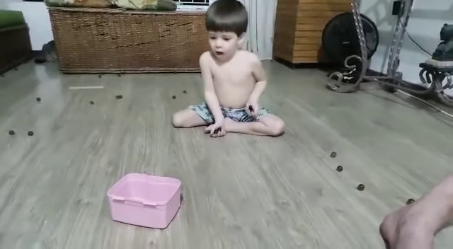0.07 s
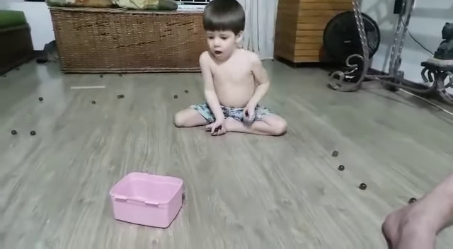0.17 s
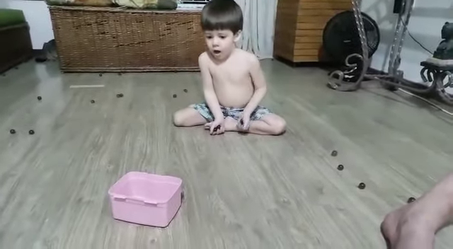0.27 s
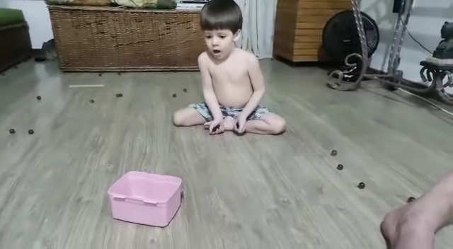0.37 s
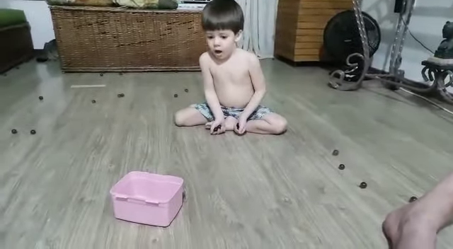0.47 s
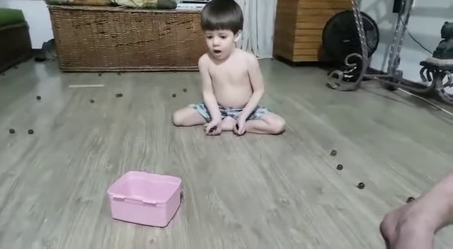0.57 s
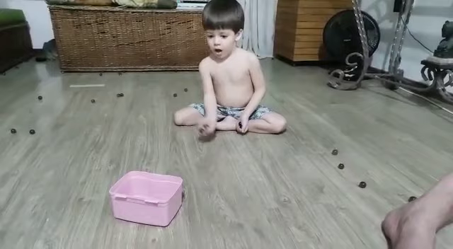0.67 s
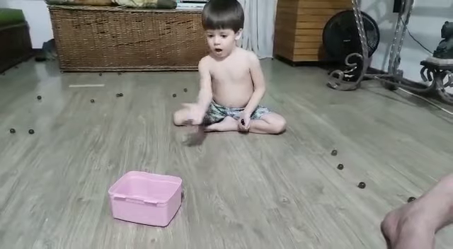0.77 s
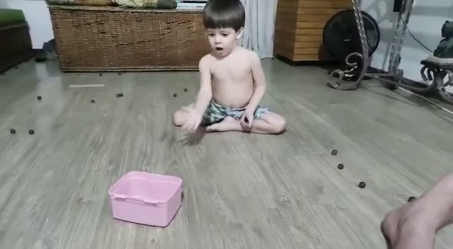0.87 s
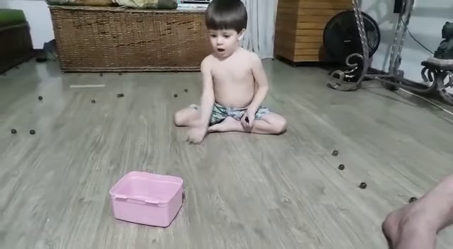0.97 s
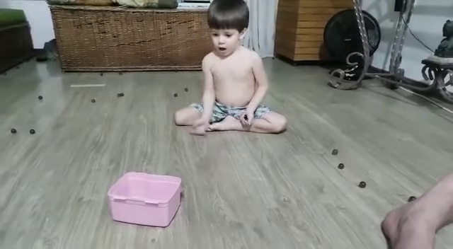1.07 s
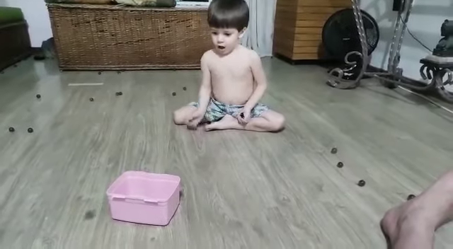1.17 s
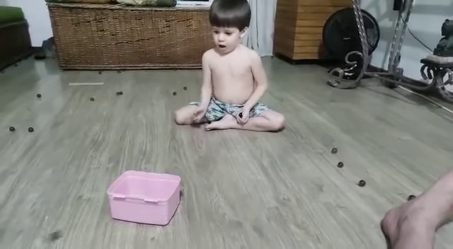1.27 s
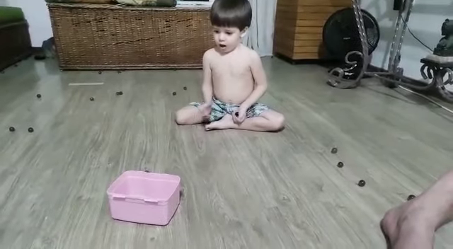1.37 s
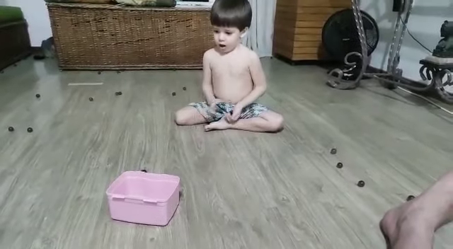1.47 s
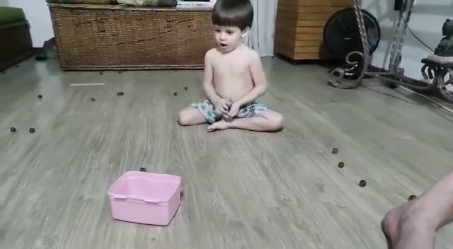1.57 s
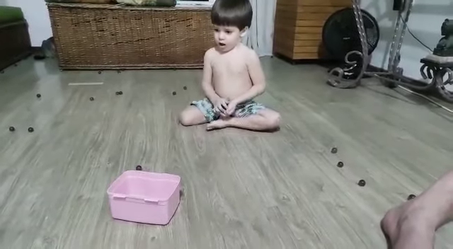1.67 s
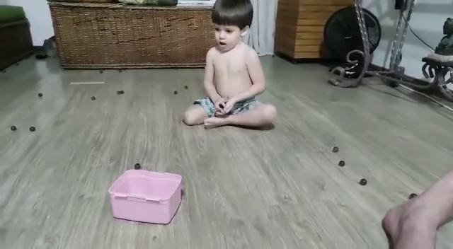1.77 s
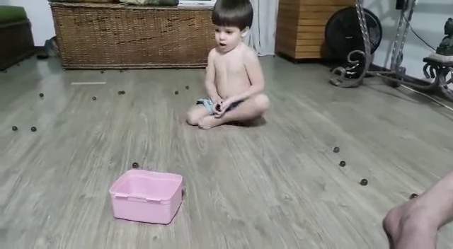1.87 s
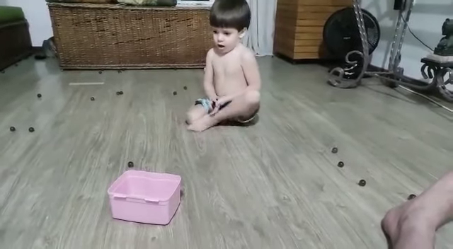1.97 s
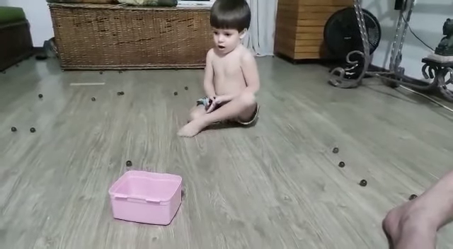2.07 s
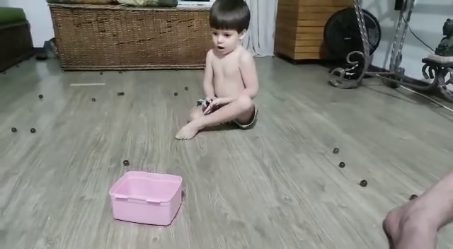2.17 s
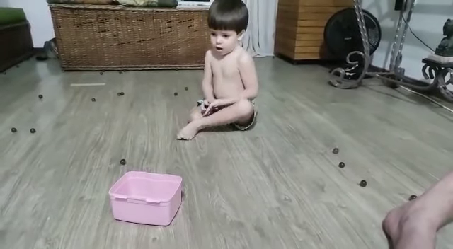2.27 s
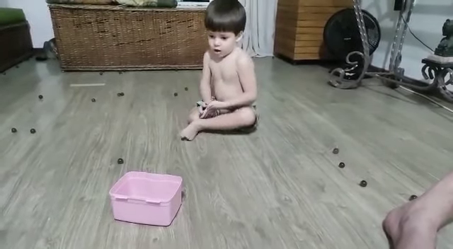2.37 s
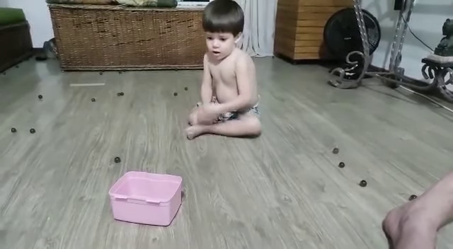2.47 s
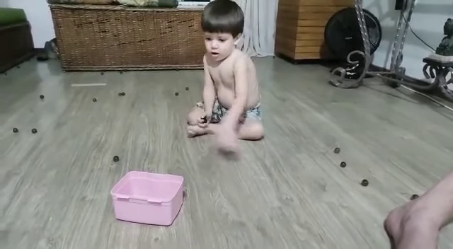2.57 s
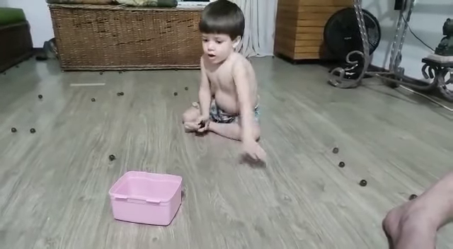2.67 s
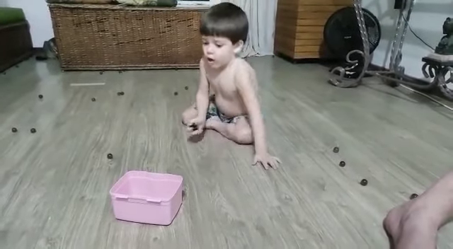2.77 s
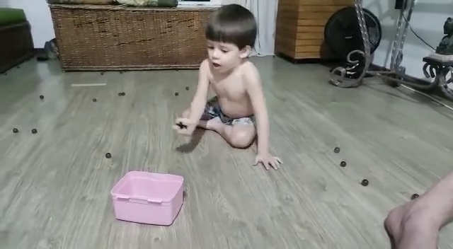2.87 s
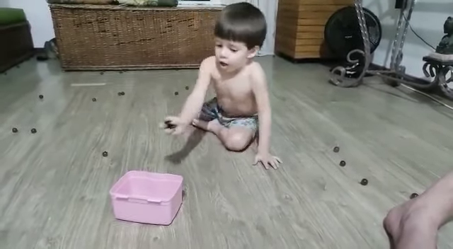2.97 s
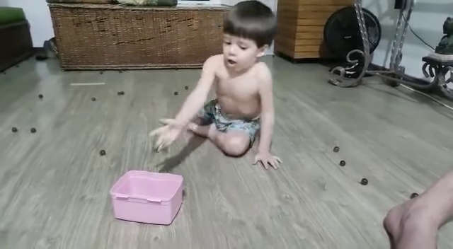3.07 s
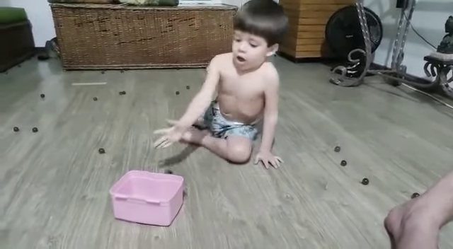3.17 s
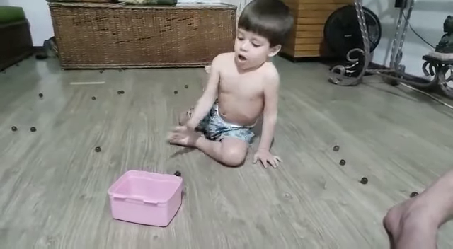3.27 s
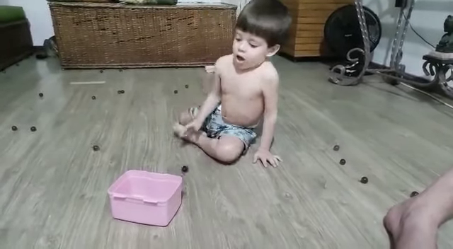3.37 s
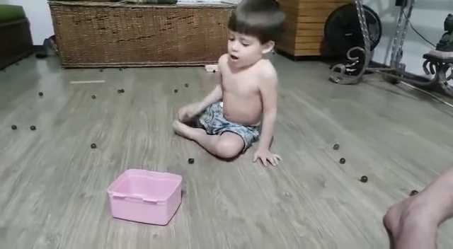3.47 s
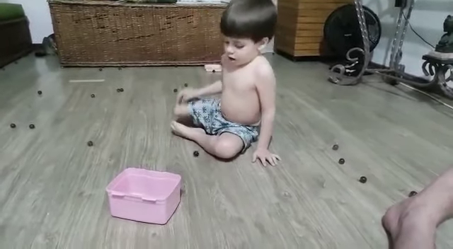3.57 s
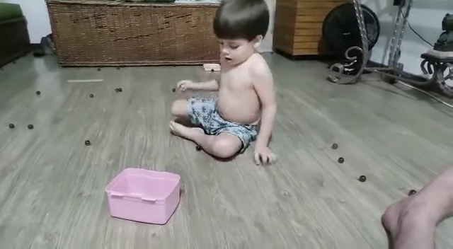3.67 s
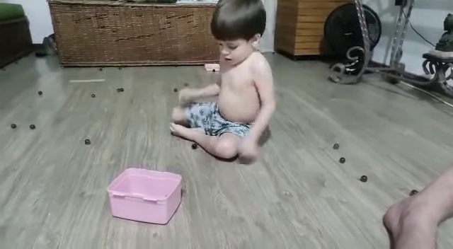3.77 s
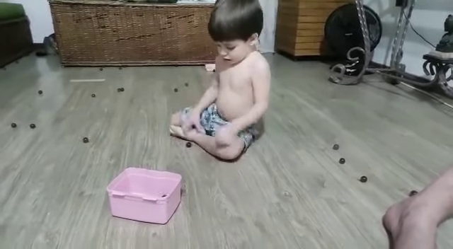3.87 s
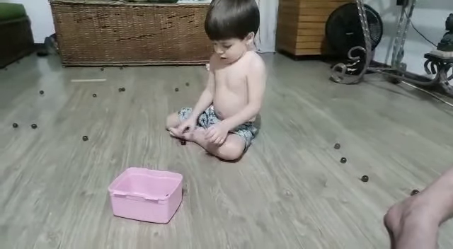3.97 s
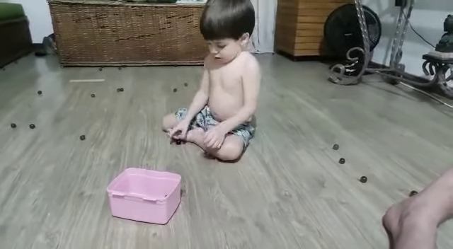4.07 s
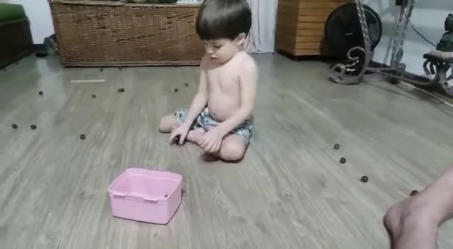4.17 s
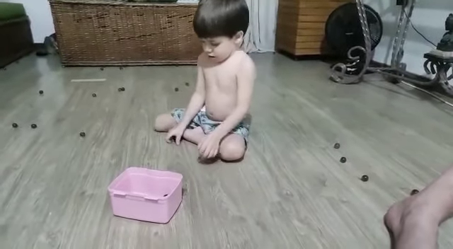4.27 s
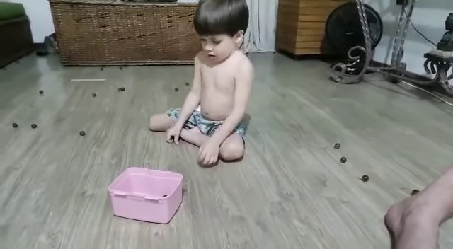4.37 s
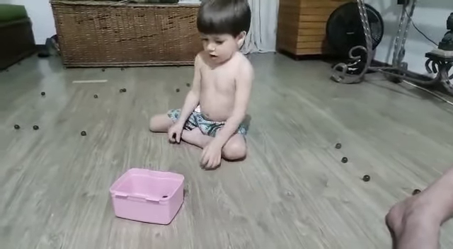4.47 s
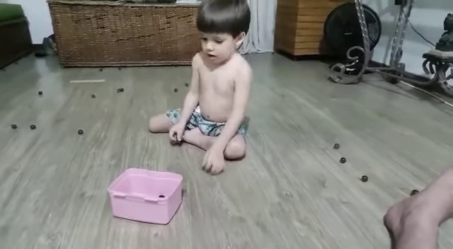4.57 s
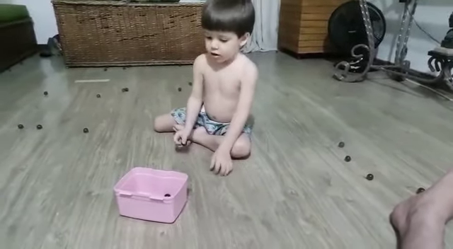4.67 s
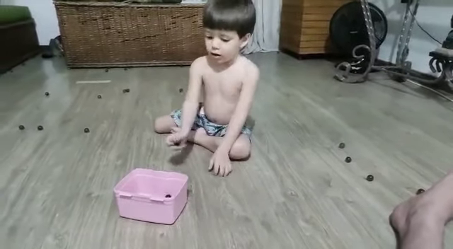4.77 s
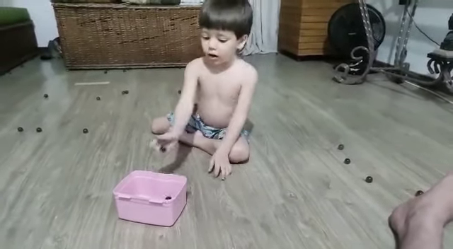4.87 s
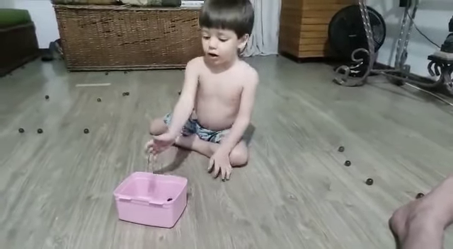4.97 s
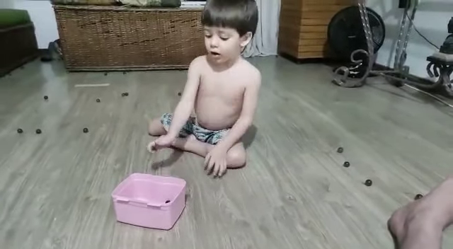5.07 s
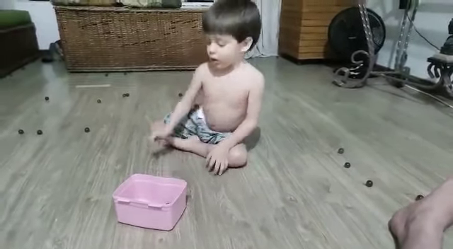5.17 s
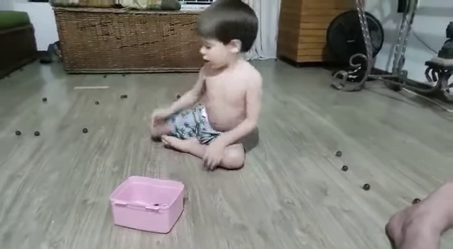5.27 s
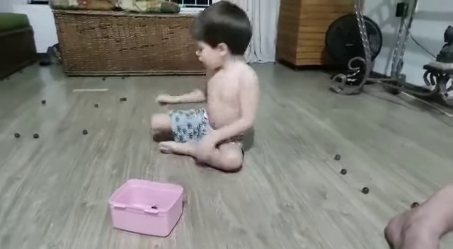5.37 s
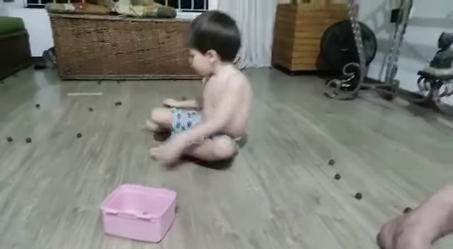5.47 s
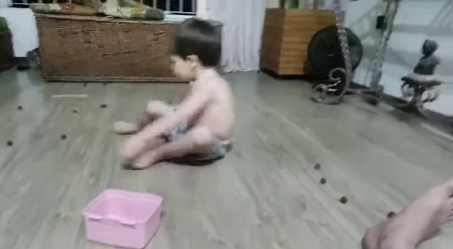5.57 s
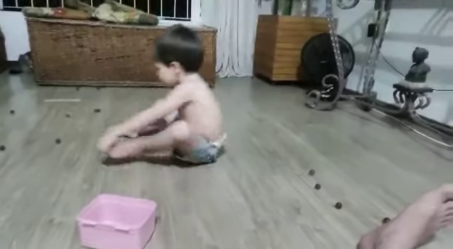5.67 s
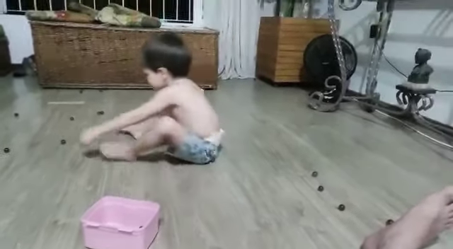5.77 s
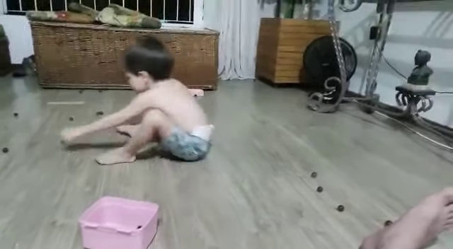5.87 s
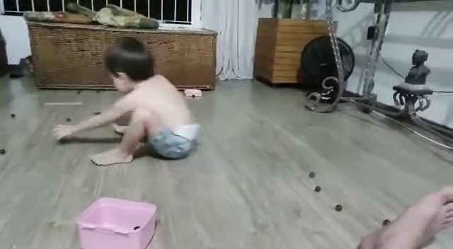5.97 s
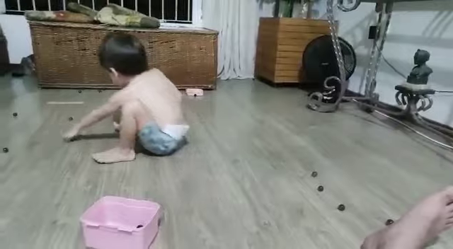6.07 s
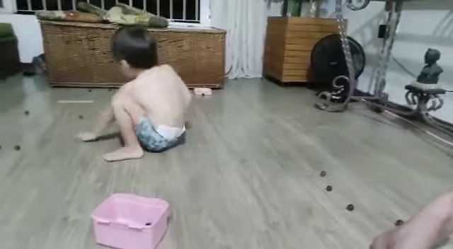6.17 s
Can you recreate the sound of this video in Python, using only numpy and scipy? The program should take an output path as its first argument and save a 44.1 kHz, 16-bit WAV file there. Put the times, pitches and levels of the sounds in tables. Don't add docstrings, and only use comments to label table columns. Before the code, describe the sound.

A lively hard-floored living room, heard close in stereo over quiet air noise and a faint low hum. A skin rub on varnish dies away in the first quarter second; a tiny glass clink comes at 0.8. From 1.07 to 1.3 several marbles strike laminate with loud, sharp cracks and woody knocks, then weaker bounces and rolling until about 2, with a bright ring of under a second. Skin squeaks and hisses from 2.4 to 3.2. At 3.2 to 3.45 another loud burst includes a hard plastic tub hit, then a dull roll and scattered tiny skips. Longer faint squeaky shuffling runs 3.75 to 5.1. At 5.15 marbles clatter in the tub, loudest at 5.17, bouncing until 5.45 and rolling away. A soft microphone thump at 5.54 leads into low body thuds, cloth drag and squeaking to the end.

```python
import sys
import numpy as np
from scipy import signal
from scipy.fft import rfft, irfft
from scipy.io import wavfile
from scipy.ndimage import uniform_filter1d

SR = 44100
rng = np.random.default_rng(int(sys.argv[2]) if len(sys.argv) > 2 else 0)


def voltage_ratio(decibels):
    exponent = np.asarray(decibels, float) / 20
    return 10 ** exponent


def transcribe(u):
    v = np.clip(np.atleast_2d(u).T, -1, 1)
    q = np.round(v * 32767).astype(np.int16)
    wavfile.write(sys.argv[1], SR, q)


N = 273640
TIME = np.arange(N) / SR

# start_s, peak_db, knock_over_thud_db, crack_over_thud_db, room_share_db (low when close to
MARBLE_BLOWS = [(1.069, -3.5, 4, 9, 2.5), (1.08, -5.5, 1, 4.5, -3.5), (1.127, -11, 4.5, 10, -1.5),
                (1.215, -4.5, 3.5, 5.5, -7), (1.225, -3.5, 3, 8.5, -4), (1.294, -10.5, -1, 1, -9),
                (1.404, -24.5, 4, -14, -14.5), (1.44, -17, 6.5, -3.5, -10.5), (1.463, -19.5, -2, -8.5, -4),
                (1.564, -27, -7, -22, 2.5), (1.585, -31.5, 1, -22.5, -4), (1.611, -18, -2.5, -22.5, -15),
                (1.665, -14, 3, -3.5, -5), (1.689, -23, -2.5, -10, -14.5), (1.757, -35, -12, -7, -16),
                (1.908, -25.5, 2, -10, -9.5), (1.917, -29, -1.5, -3, -6.5),
                (2.822, -39, -8.5, -10.5, -3), (3.224, -16, -6, -6.5, -0.5), (3.324, -2.5, 4.5, 10, -2.5),
                (3.351, -16.5, 0, -1, 0), (3.419, -6.5, 3.5, 6, -2), (3.449, -9, 3, 1.5, -7.5),
                (3.678, -29, -1, -24, -2.5), (3.731, -26.5, -1, -11, -4.5), (3.914, -33.5, 3, -7, -7),
                (4.087, -31, -3, -14.5, -4.5), (4.144, -39.5, 2, -16, -13), (4.321, -46.5, -5, -6, 6.5),
                (4.341, -42, 3, -2, 0.5), (4.396, -37, 10, -2, -7), (5.931, -45.5, -6, -7, 7)]
TUB_BLOWS = [
    (3.273, -7, -1, 7, -5),
    (3.278, -13, -8, -21, -1),
    (3.284, -15.5, -8, -22, -9.5),
    (5.147, -14.5, -17, -7.5, -5),
    (5.171, -4.5, 0, 0.5, -5),
    (5.327, -9, -7.5, -6, -8.5),
    (5.397, -13, -5.5, -3, -8),
    (5.432, -19.5, -7.5, -21, -5.5),
    (5.45, -15, -5.5, -14, -7.5),
]
CLINKS = [
    (0.81, -41, 12, 31.5, -6.5),
    (3.989, -44, 19, 18, -8),
]
# start_s, length_s, level_db, loss_over_run_db, brightness_db
ROLLS = [
    (1.237, 0.35, -38, 18, 4),
    (1.762, 0.3, -41.5, 29, -8),
    (3.413, 0.68, -38.5, 10, -7.5),
    (4.146, 0.34, -61, -0.5, -4.5),
    (5.206, 0.67, -36.5, 46, 3),
]

# pitch_hz, width_hz, level_db
BOARD_THUD = [(440, 258, -3.5), (696, 267, 1.33), (1040, 970, 1.5)]
LAMINATE_KNOCK = [(1913, 730, -2.5), (2664, 532, -1)]
GLASS_CRACK = [(3283, 810, -1.5), (4300, 1950, 4.5), (7500, 18000, -18.5), (12030, 7700, -32)]
GLASS_PING = [(5383, 2800, 12), (8010, 4700, -9.5), (12000, 4000, -12)]
TUB_PARTS = [
    [(285, 353, -0.5), (695, 560, 4), (1067, 198, -2.5)],
    [(2027, 300, 0.3), (2360, 650, 3)],
    [(3540, 2900, 4), (5200, 5200, -8.5), (7820, 6800, -9.5), (13500, 5200, -30)],
]

# start_s, pressure_db
SLIDES = [
    [(0.0, 2), (0.15, -10), (0.25, -24)],
    [(2.4, -12.5), (2.49, -20), (2.56, -8.5), (2.75, -16.5), (2.86, -4), (3.1, 0.5), (3.21, -3)],
    [(3.75, -4.5), (4.05, -3.5), (4.25, -6), (4.33, -0.5), (4.41, 0.5), (4.66, -4), (5.12, -7.5)],
    [(5.55, -4.5), (5.79, -8.5), (5.88, -7.5), (5.93, 0), (6.03, -9.5), (6.2, -8.5)],
]
# squeak_hz, squeak_db, whistle_db, hiss_db, fine_hiss_db
SLIDE_VOICES = [(2440, -77, -77.5, -76.5, -89), (2880, -63, -68, -70, -81.5), (2730, -69, -69, -84, -96),
                (2720, -62, -67.5, -68.5, -78)]
# pitch_hz, width_hz
RUB = [(4700, 520), (6200, 2800), (10500, 4500)]
# start_s, end_s, start_db, end_db
DRAGS = [
    (2.5, 2.75, -92, -92),
    (4.55, 4.95, -91, -92),
    (5.65, 6.2, -83.5, -77),
]
# pitch_hz, width_hz, level_db
WEAVE = [(8530, 900, -4), (10900, 1000, -3)]
# start_s, level_db, fade_db_per_s
BOOMS = [(1.09, -49.5, 24.5), (1.5, -48.5, 60), (1.66, -55.5, 18), (3.28, -47, 24), (3.87, -54.5, 58.5),
         (4.09, -52, 104), (5.18, -52.5, 10), (5.54, -47, 54.5), (5.929, -45, 97)]
# start_s, peak_db, pitch_hz, nail_db
TAPS = [
    (1.5, -25, 192, -28),
    (4.57, -36.5, 153, -21.5),
    (5.544, -16, 220, -36),
]

# pitch_hz, decay_s (to -60 dB)
ROOM_T60 = [(250, 0.84), (660, 0.82), (1740, 0.65), (4500, 0.66), (8000, 0.5), (14000, 0.42)]
# pitch_hz, level_db
ROOM_COLOUR = [(250, -2), (700, -3.46), (1500, 6.5), (2500, -0.36), (4500, 3.5), (8000, 2.5), (14000, -4.5)]
# pitch_hz, level_db (per Hz)
AIR = [(18, -70), (30, -38), (124, -8), (149, -30.5), (184, -16.5), (336, -22.5), (374, -23.5), (461, -13),
       (616, -27.5), (1220, -24.5), (1590, -28.5), (2120, -32.5), (16000, -61)]
# pitch_hz, likeness (-1 to 1)
LIKENESS = [(60, 0.95), (180, 0.95), (550, 1), (1650, -0.072), (4970, 0.055), (15000, 0.43)]
# pitch_hz, left_over_right_db
PORTS = [(60, -6), (150, -4.5), (380, 2.5), (950, -5.5), (2380, -7.5), (5980, -2), (15000, 8.5)]

BENDING_S = 0.0016
WALL_S = 0.034
ECHO_DB, ECHO_FOLLOWS = -17, 0.36
ROOM_HARDER = 1.03
ROLL_ATTACK_S, ROLL_RELEASE_S = 0.056, 0.03
SQUEAK_HZ_PER_DB, FINE_FOLLOWS = 35.5, 0.4
BOOM_RISE_DB_PER_S, BOOM_LASTS_S = 397.5, 0.42
AIR_DB = -52.5
HUM_HZ, HUM_WIDTH_HZ, HUM_DB = 119, 10, -62
RIGHT_LAG = 10
GATE_DB, TREBLE_GATE_DB = -55, -59.5
FIZZ_DB, FIZZ_KNEE_DB = -55, -32
FIZZ_HOLD_S = 0.012
CUTOFF_HZ = 16000


def at_hz(points, hz):
    table_hz, value = np.transpose(points)
    return np.interp(np.log(hz), np.log(table_hz), value)


def rms_one(x):
    return x / np.sqrt(np.mean(x ** 2) + 1e-20)


def butter(x, order, hz, kind="low"):
    return signal.sosfilt(signal.butter(order, hz, kind, fs=SR, output="sos"), x)


def resonate(x, hz, width_hz):
    r = np.exp(-np.pi * width_hz / SR)
    feedback = [1, -2 * r * np.cos(2 * np.pi * hz / SR), r * r]
    return signal.lfilter(np.array([1, 0, -1]) * (1 - r * r) / 2, feedback, x + 1e-18)


def resonate_twice(x, hz, width_hz):
    return resonate(resonate(x, hz, width_hz), hz, width_hz)


def body(clicks, modes):
    out = 0
    for k, (hz, width, db) in enumerate(modes):
        gain = voltage_ratio(db) * SR / (2 * np.pi * width)
        out = out + (-1) ** k * gain * resonate(clicks, hz, width)
    return out


def bending(x):
    size = x.shape[-1]
    hz = np.clip(np.fft.rfftfreq(size, 1 / SR), 3000, None)
    delay_s = BENDING_S * (np.sqrt(10000 / hz) - 1.2)
    phase = -2 * np.pi * np.cumsum(delay_s) * SR / size
    return irfft(rfft(x) * np.exp(1j * phase), size)


def blows(table, parts, contact_hz):
    near, far, size = np.zeros((2, N + 4096)), np.zeros((3, N + 4096)), 2048
    luck = rng.random((len(table), 2, 2, 4))
    click = signal.unit_impulse(size, 64)
    pushes = [butter(click, 2, hz) for hz in contact_hz]
    thud, knock, crack = [bending(body(push, modes)) for push, modes in zip(pushes, parts)]
    thud = np.roll(thud, -75)
    for k, (s, db, knock_db, crack_db, share_db) in enumerate(table):
        start, wall = round(s * SR) - 64, round((s + WALL_S) * SR)
        mix_db = np.array([0, knock_db, crack_db])
        spread = voltage_ratio(ROOM_HARDER * mix_db)
        room_feed = spread @ [thud, knock, crack] / np.linalg.norm(spread)
        far[k % 3, start:start + size] += voltage_ratio(db + share_db) * room_feed
        low, mid, high = voltage_ratio(mix_db)[:, None] * [thud, knock, crack]
        hard = mid + high
        pair = np.zeros((2, size))
        for side in range(2):
            echoes = 0
            for when, sign in zip(*luck[k, side]):
                lag = int(when * 0.0025 * SR) + 12
                echoes = echoes + np.sign(sign - 0.5) * 0.5 * np.roll(hard, lag)
            pair[side] = low + hard + echoes
        pair /= np.abs(pair[0] + np.roll(pair[1], RIGHT_LAG)).max() / 2
        near[:, start:start + size] += voltage_ratio(db - 1) * pair
        near[:, wall:wall + size] += voltage_ratio(db + ECHO_DB + ECHO_FOLLOWS * share_db) * pair[::-1]
    return near[:, :N], far[:, :N]


def rolling():
    sizes = voltage_ratio(4.7 * np.minimum(rng.exponential(1, N), 5)) * rng.choice([-1, 1], N)
    clicks = sizes * (rng.random(N) < 400 / SR)
    dull = rms_one(body(clicks, BOARD_THUD))
    bright = rms_one(body(clicks, LAMINATE_KNOCK) + voltage_ratio(-12.5) * body(clicks, GLASS_CRACK))
    out = np.zeros(N)
    for s, length, db, loss_db, bright_db in ROLLS:
        t = TIME - s
        edges = np.interp(t, [-ROLL_ATTACK_S, 0, length, length + ROLL_RELEASE_S], [0, 1, 1, 0])
        level = voltage_ratio(db - 3 - loss_db * np.clip(t / length, 0, 1))
        out += edges * level * (dull + voltage_ratio(bright_db) * bright)
    return out


def bands(length):
    edges = 30 * 2 ** np.arange(0, 9.6, 0.5)
    white = rng.standard_normal((2, 2, length))
    for k, (low, high) in enumerate(zip(edges, edges[1:])):
        mid, side = butter(white[k % 2], 2, [low, high], "band")
        hz = np.sqrt(low * high)
        alike = np.clip(at_hz(LIKENESS, hz), -1, 1)
        yield hz, np.sqrt(1 + alike) * mid + np.sqrt(1 - alike) * side * [[1], [-1]]


def room(x):
    t = TIME[:SR]
    lumps = np.repeat(np.clip(rng.standard_normal(SR // 20 + 1), -2, 2), 20)[:SR]
    grain = voltage_ratio(3 * lumps * np.exp(-t / 0.43))
    tail = 0
    for hz, noise in bands(SR):
        tail = tail + voltage_ratio(at_hz(ROOM_COLOUR, hz) - 60 * t / at_hz(ROOM_T60, hz)) * noise
    tail = tail * grain * np.clip(t / 0.005 - 0.2, 0, 1)
    tail = tail / np.sqrt(np.sum(tail ** 2) / 2)
    return signal.fftconvolve(x[None], tail, axes=1)[:, :N]


def slides():
    noise = rng.standard_normal((4, 2, N))
    slow = butter(noise[2:], 1, 90)
    whistle, hiss, fine = [rms_one(resonate_twice(noise[k], *RUB[k])) for k in range(3)]
    out = np.zeros((2, N))
    for rows, (hz, squeak_db, whistle_db, hiss_db, fine_db) in zip(SLIDES, SLIDE_VOICES):
        s, db = np.transpose(rows)
        press_db = np.interp(TIME, s, db)
        touch = np.interp(TIME, [s[0] - 0.06, s[0], s[-1], s[-1] + 0.02], [0, 1, 1, 0])
        phase = 2 * np.pi * np.cumsum(hz + SQUEAK_HZ_PER_DB * np.maximum(press_db, -9)) / SR
        squeak = rms_one(slow[0] * np.cos(phase) + slow[1] * np.sin(phase))
        rub = voltage_ratio(squeak_db) * squeak + voltage_ratio(whistle_db) * whistle + voltage_ratio(hiss_db) * hiss
        out += touch * (voltage_ratio(press_db) * rub + voltage_ratio(fine_db + FINE_FOLLOWS * press_db) * fine)
    return out


def drags():
    noise = rng.standard_normal((2, 2, N))
    sing = sum(voltage_ratio(db) * rms_one(resonate_twice(n, hz, width)) for n, (hz, width, db) in zip(noise, WEAVE))
    pull = np.zeros(N)
    for start, end, start_db, end_db in DRAGS:
        pull += np.interp(TIME, [start - 0.05, start, end, end + 0.05], [0, voltage_ratio(start_db), voltage_ratio(end_db), 0])
    return sing * pull


def thuds():
    low = resonate(resonate(rng.standard_normal(N), 86, 90), 73, 280)
    level = np.zeros(N)
    for s, db, fade in BOOMS:
        t = TIME - s
        rise_db = (BOOM_RISE_DB_PER_S + fade) * np.minimum(t, 0)
        stop_db = BOOM_RISE_DB_PER_S * np.maximum(t - BOOM_LASTS_S, 0)
        level = np.maximum(level, voltage_ratio(db - fade * t + rise_db - stop_db))
    return level * rms_one(low)


def taps():
    out = np.zeros(N)
    for s, db, hz, nail_db in TAPS:
        for part_db, part_hz in [(7, hz), (nail_db + 30, 680)]:
            turns = (TIME - s - 0.0015) * part_hz
            out += voltage_ratio(db + part_db) * np.cos(2 * np.pi * turns) * np.exp(-(turns / 0.51) ** 2)
    return out * voltage_ratio(np.array([[-28], [0]]))


def background():
    air = rms_one(sum(voltage_ratio(at_hz(AIR, hz)) * noise for hz, noise in bands(N)))
    hum = rms_one(resonate(resonate(rng.standard_normal(N), HUM_HZ, HUM_WIDTH_HZ), HUM_HZ, 30))
    return voltage_ratio(AIR_DB - 8.5) * air + voltage_ratio(HUM_DB) * hum


def suppress(x):
    low = signal.sosfiltfilt(signal.butter(2, 5500, fs=SR, output="sos"), x)
    out = 0
    for band, gate_db in [(low, GATE_DB), (x - low, TREBLE_GATE_DB)]:
        power = uniform_filter1d(np.mean(band ** 2, axis=0), size=1024)
        out = out + band * (0.15 + 0.85 * power / (power + voltage_ratio(gate_db) ** 2))
    return out


def scene():
    sets = [blows(MARBLE_BLOWS, [BOARD_THUD, LAMINATE_KNOCK, GLASS_CRACK], [2200, 4000, 7000]),
            blows(TUB_BLOWS, TUB_PARTS, [2500, 4000, 8000]),
            blows(CLINKS, [BOARD_THUD, LAMINATE_KNOCK, GLASS_PING], [2000, 4000, 14000])]
    direct, spots = [sum(part) for part in zip(*sets)]
    roll = rolling()
    spots[0] += voltage_ratio(-11) * roll
    wet = voltage_ratio(12) * sum(room(x) for x in spots)
    floor = direct + wet + voltage_ratio(-13) * roll
    floor = butter(floor, 2, 300, "high")
    hz = np.maximum(np.fft.rfftfreq(N, 1 / SR), 1)
    ports = voltage_ratio(at_hz(PORTS, hz) * [[0.5], [-0.5]])
    floor = suppress(irfft(rfft(floor) * ports, N))
    left, right = floor + slides() + drags() + thuds() + background()
    return np.array([left, np.roll(right, RIGHT_LAG)]) + taps()


def band_limit(x):
    return signal.sosfilt(signal.butter(12, 16640, fs=SR, output="sos"), x)


def record(dry):
    above_bass = butter(dry, 2, 800, "high")
    keep = np.exp(-1 / (FIZZ_HOLD_S * SR))
    power = signal.lfilter([1 - keep], [1, -keep], np.mean(above_bass ** 2, axis=0))
    fizz = butter(rng.standard_normal(dry.shape), 4, [8500, 15400], "band")
    fizz = voltage_ratio(FIZZ_DB) * fizz * (power / (power + voltage_ratio(FIZZ_KNEE_DB) ** 2)) ** 3.5
    mix = np.clip(butter(dry + fizz, 2, 50, "high"), -0.9, 0.9)
    mix = signal.sosfilt(signal.cheby2(12, 60, CUTOFF_HZ + 500, fs=SR, output="sos"), mix)
    return band_limit(mix)


dry = scene()
out = record(dry)
transcribe(out)
```